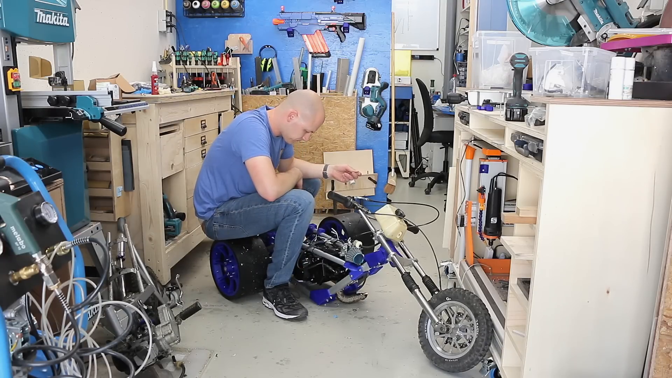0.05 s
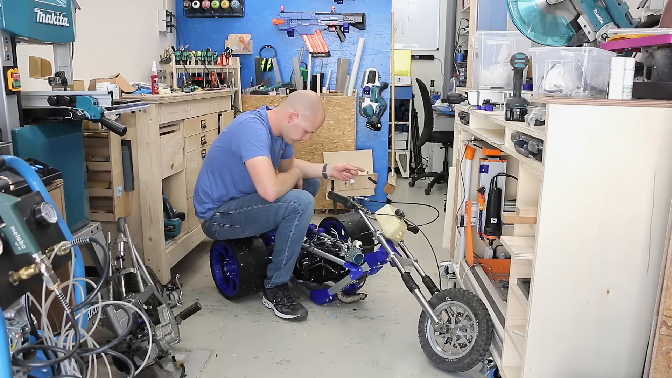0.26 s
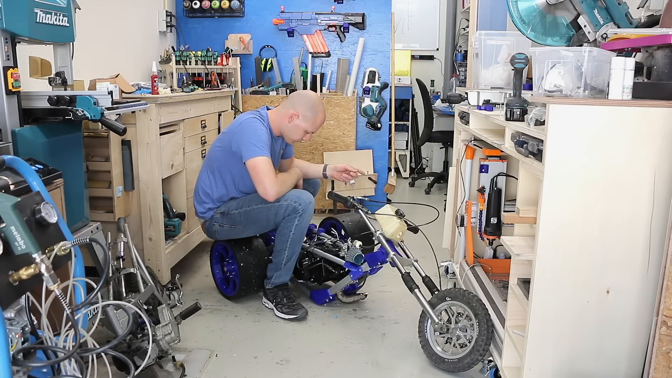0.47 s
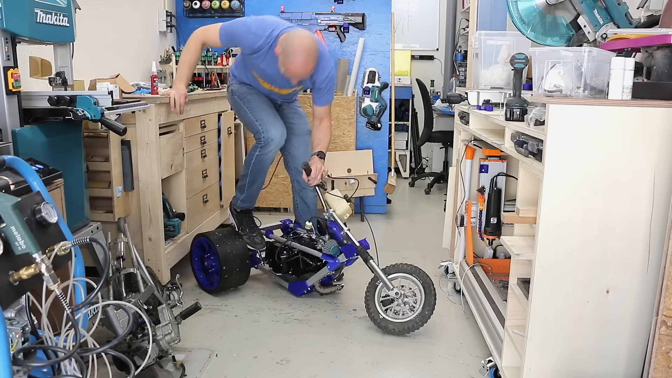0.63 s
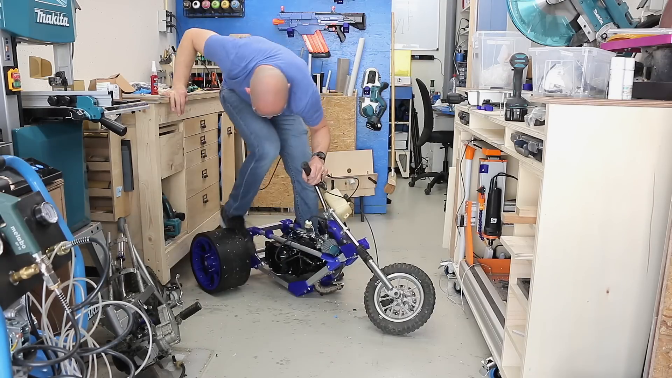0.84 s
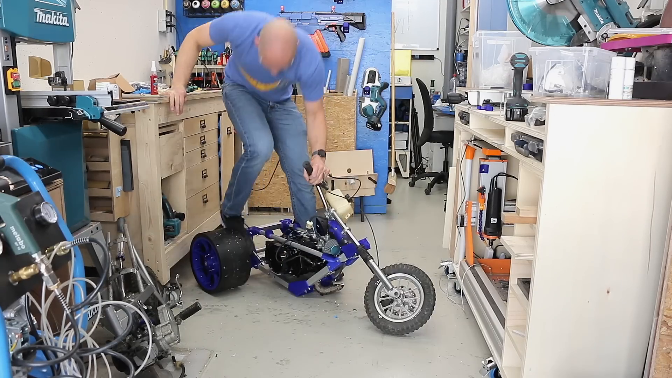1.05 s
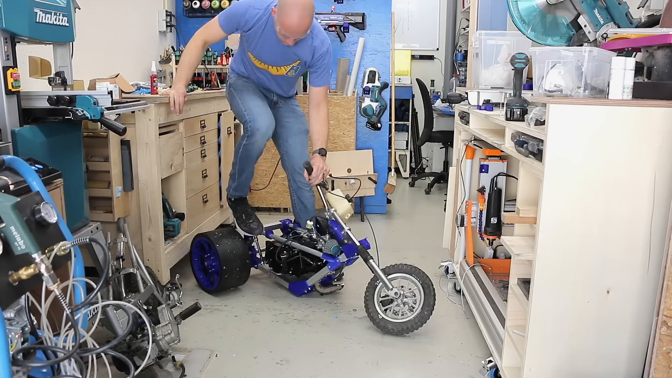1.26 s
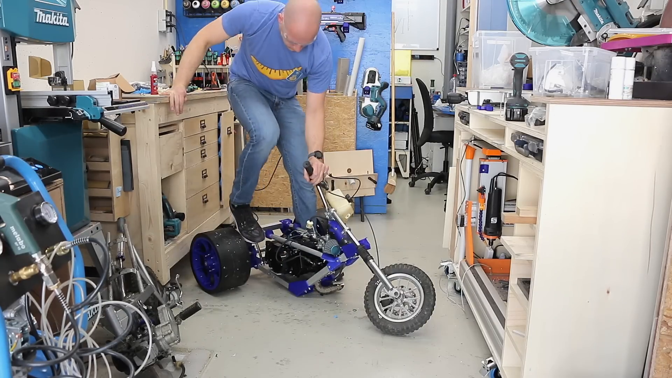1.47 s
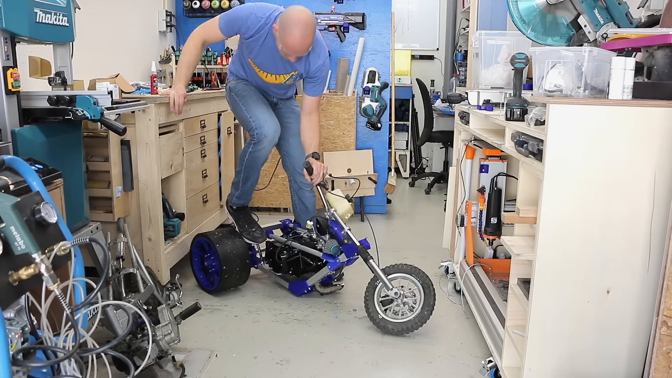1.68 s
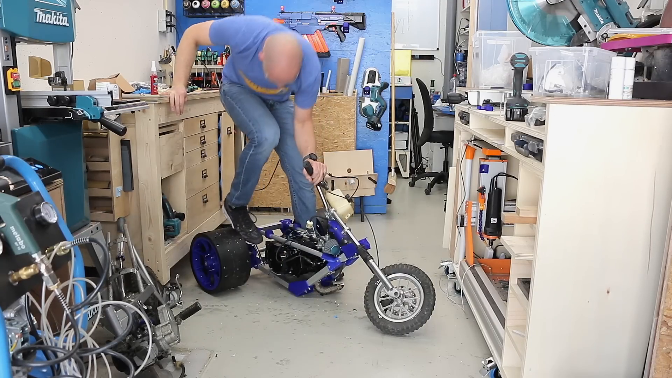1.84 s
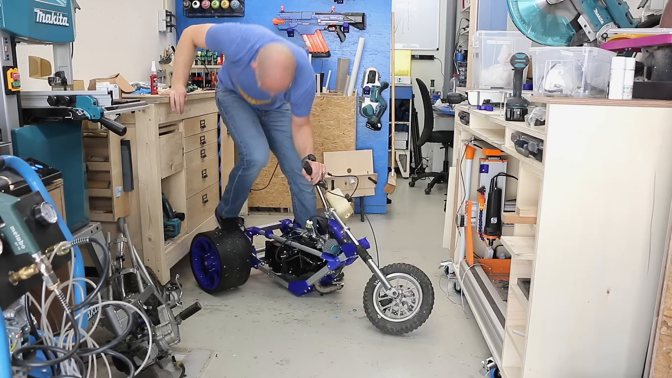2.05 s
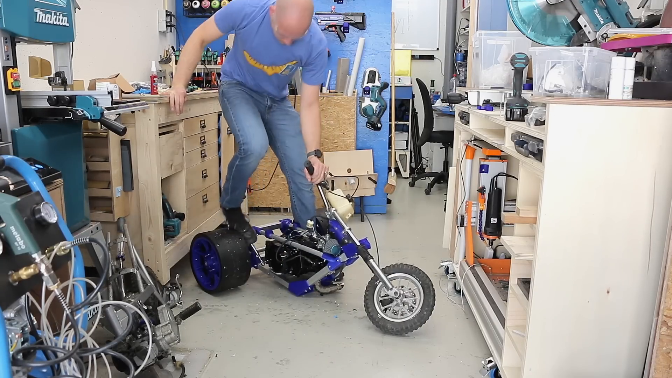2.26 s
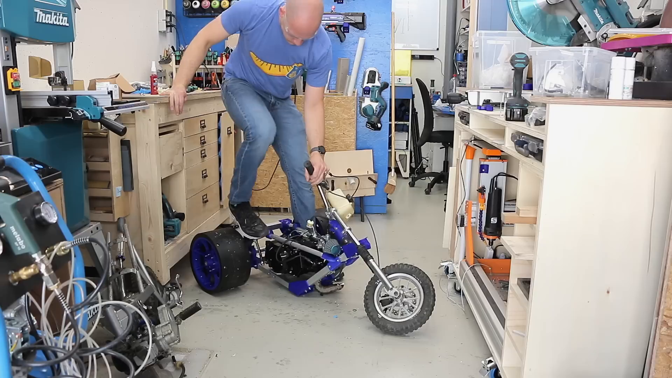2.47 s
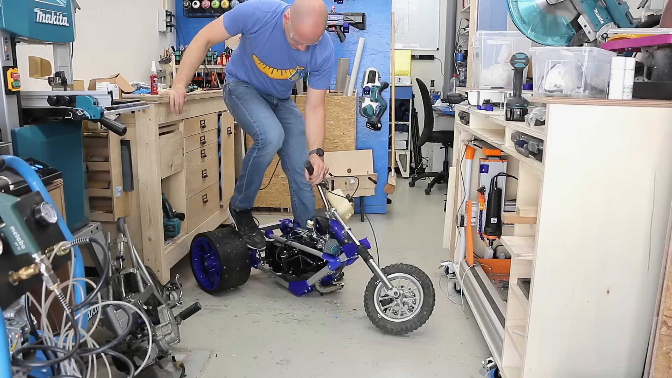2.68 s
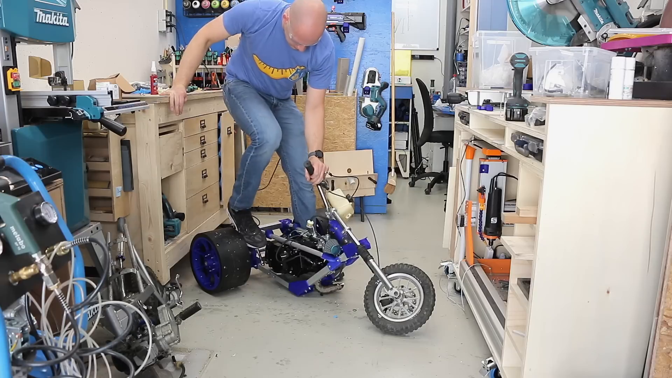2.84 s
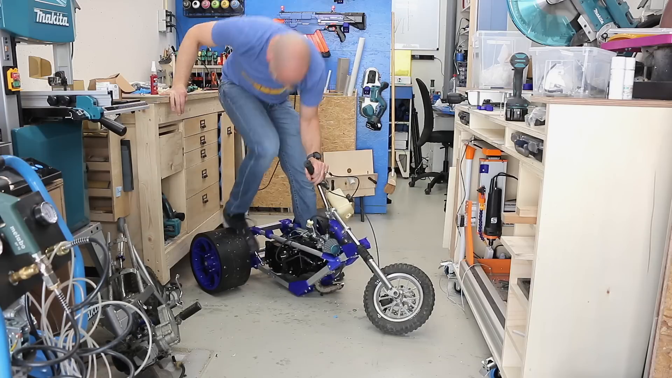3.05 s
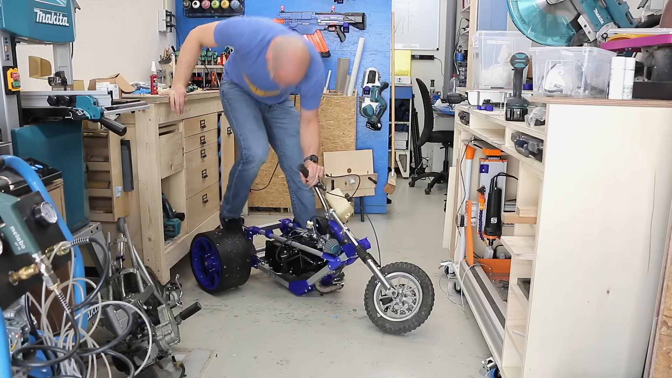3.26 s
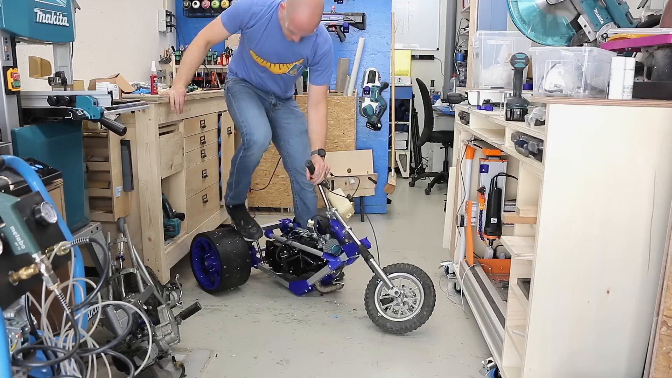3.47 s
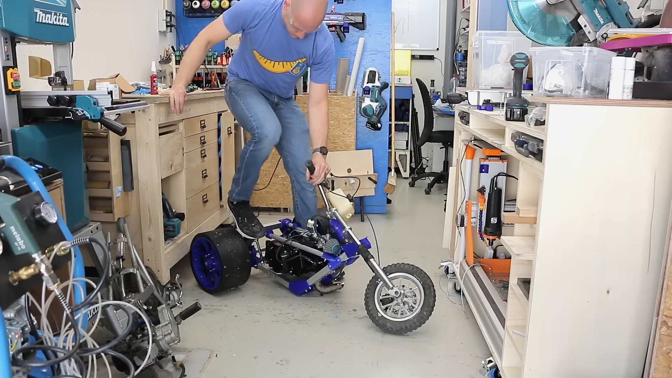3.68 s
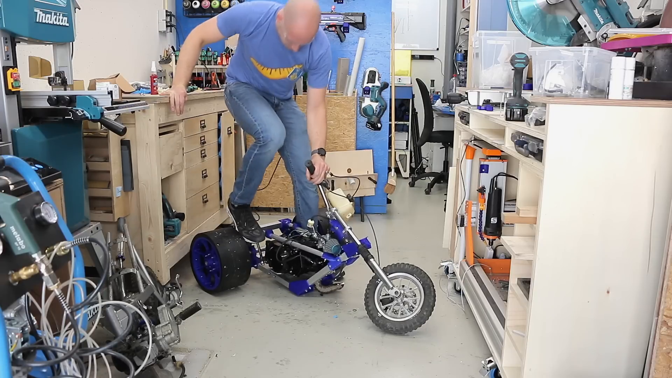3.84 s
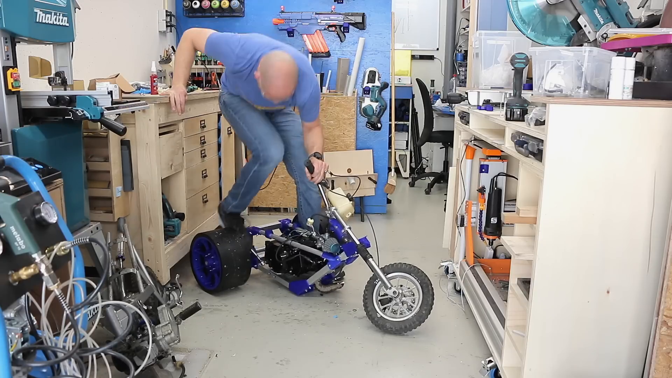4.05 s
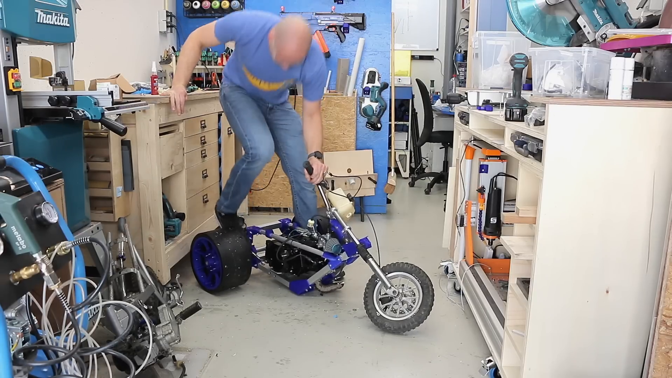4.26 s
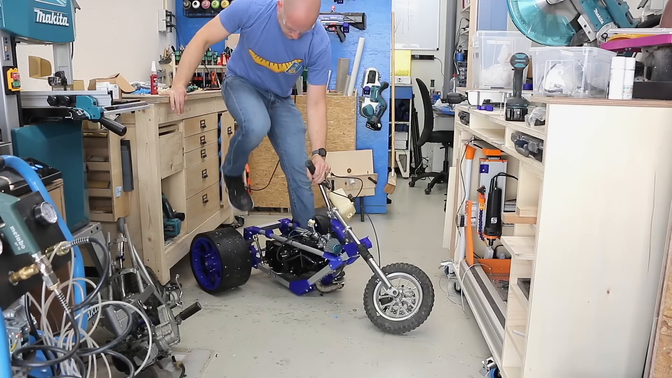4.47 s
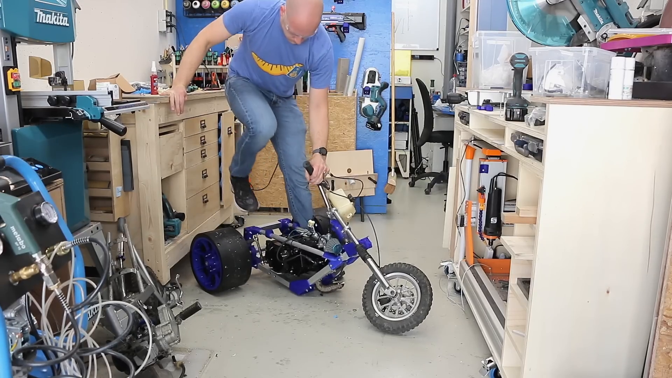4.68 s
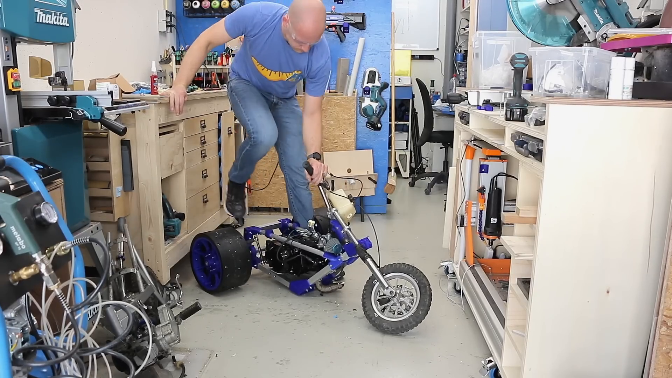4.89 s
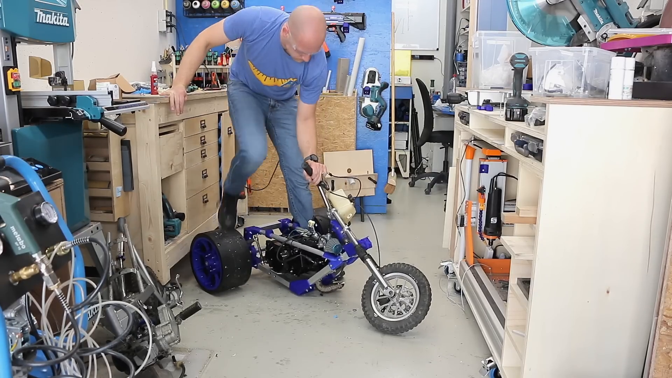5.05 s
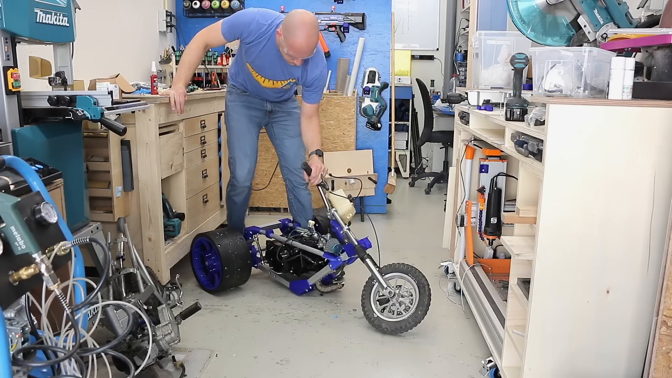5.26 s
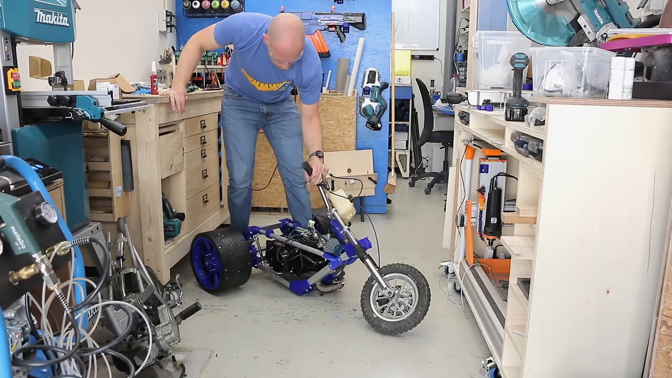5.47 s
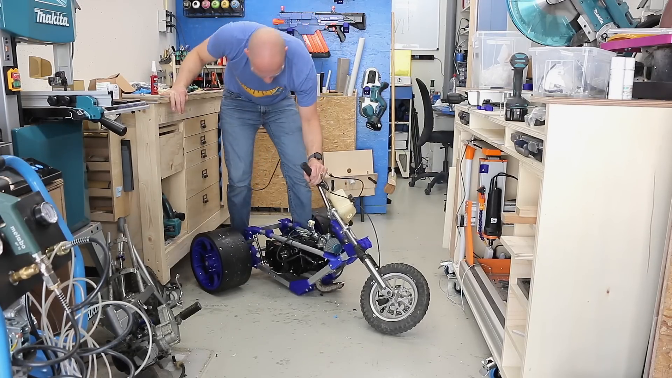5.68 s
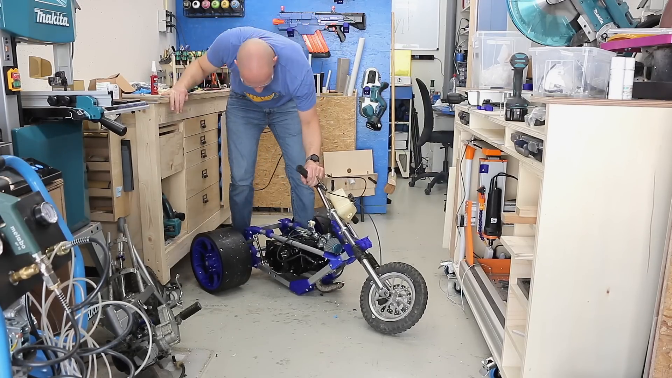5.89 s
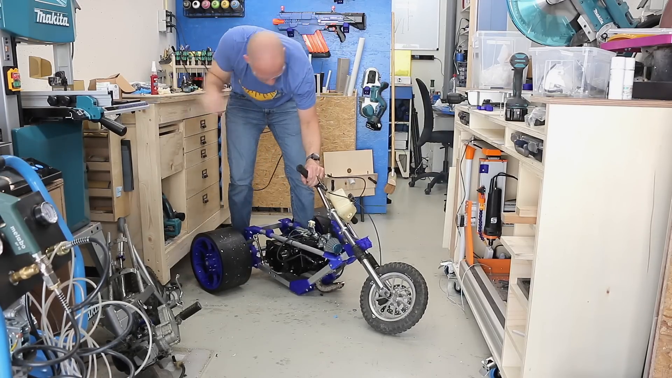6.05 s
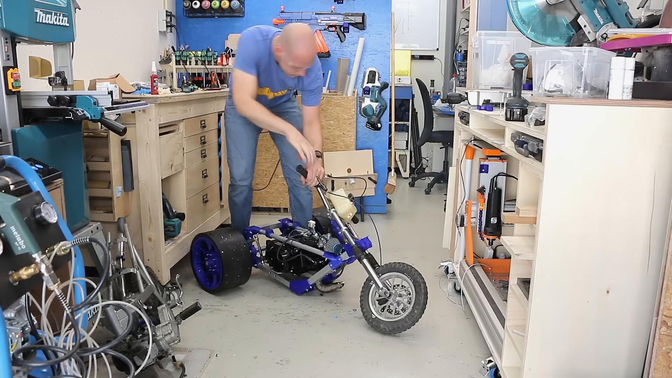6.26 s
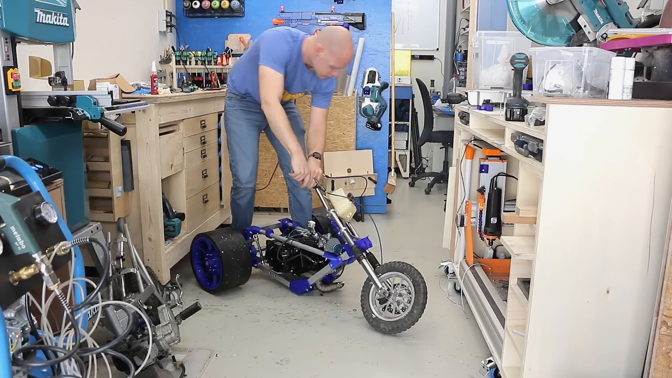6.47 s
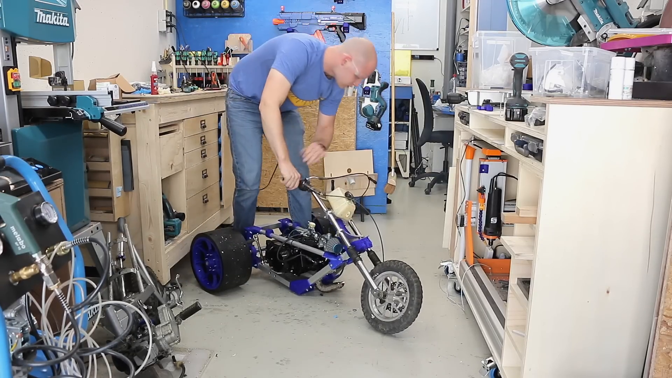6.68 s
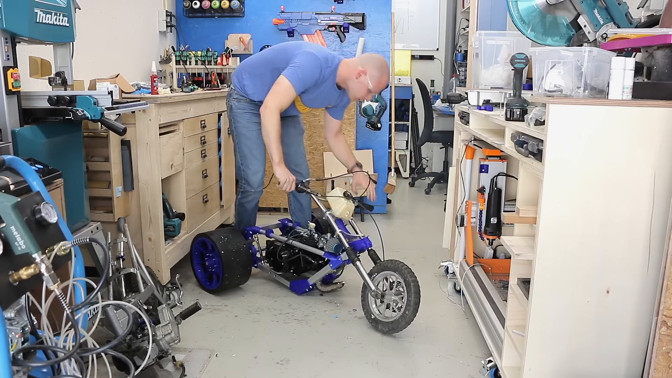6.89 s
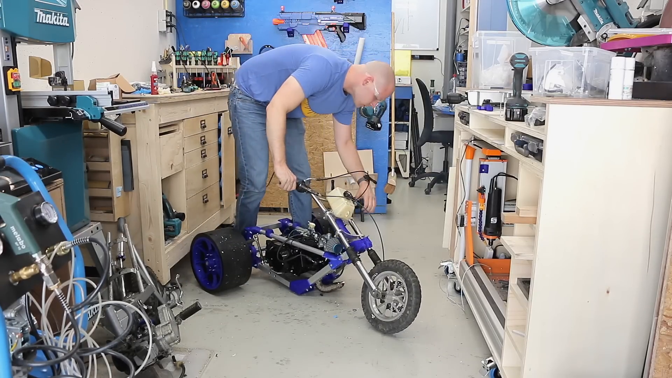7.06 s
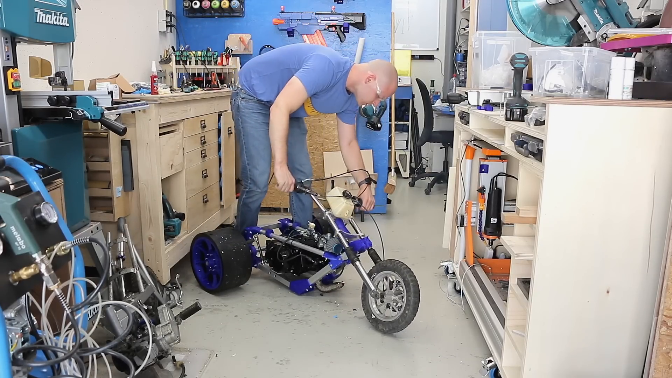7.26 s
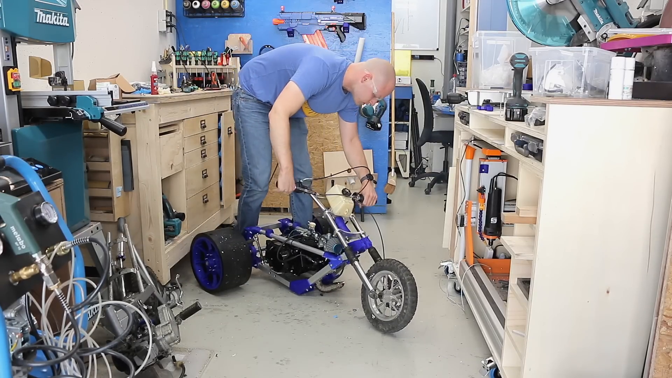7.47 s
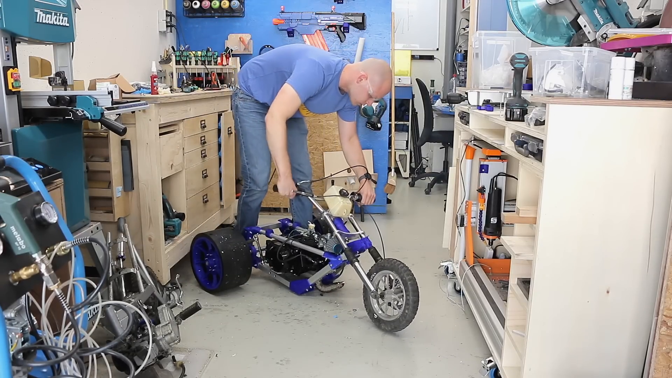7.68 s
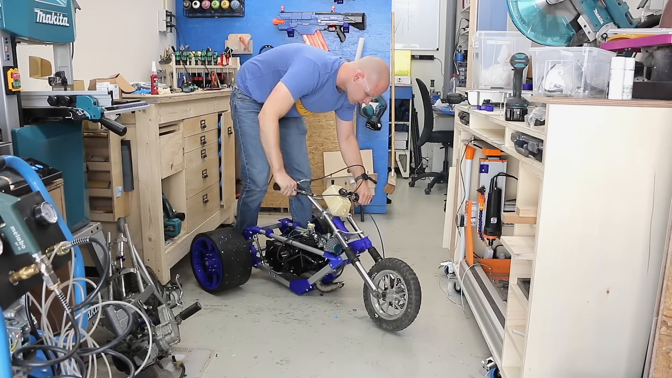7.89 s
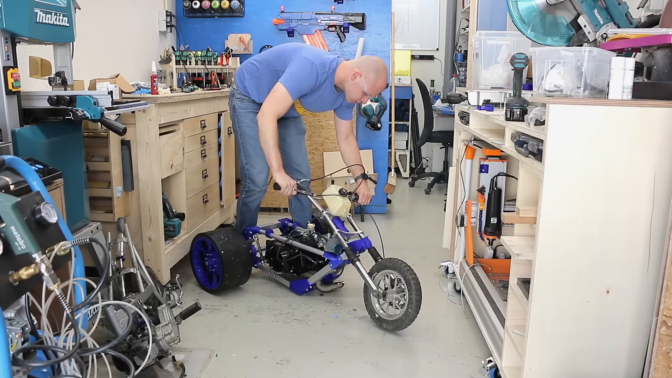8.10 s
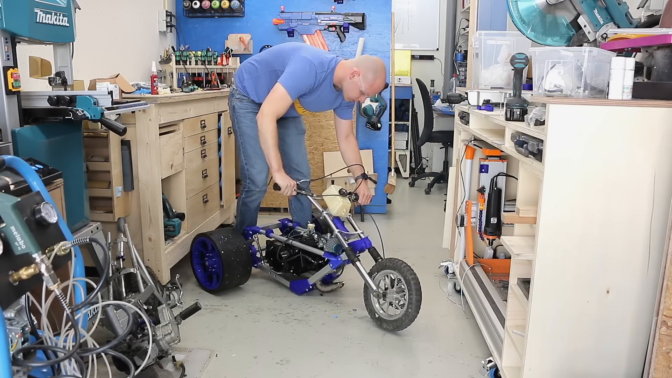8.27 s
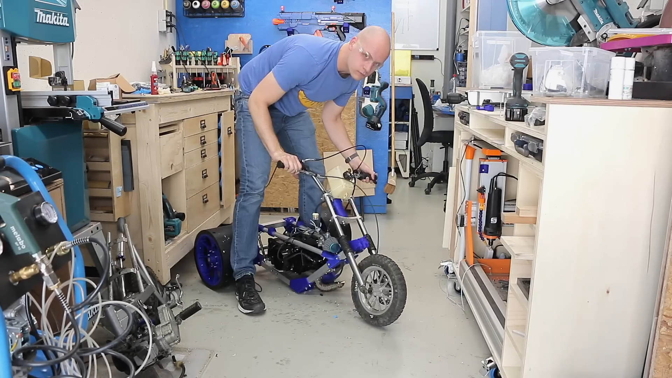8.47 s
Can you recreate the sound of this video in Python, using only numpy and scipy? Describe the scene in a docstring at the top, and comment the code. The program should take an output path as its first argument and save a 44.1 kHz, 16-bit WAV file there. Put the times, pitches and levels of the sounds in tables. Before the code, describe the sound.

In a cluttered workshop, a low hum cuts to a kick lever on a small motor trike: rapid gear whirr, ringing steel clanks, ratchet clicks and hollow unfired puffs. After three failed kicks the fourth catches. The single-cylinder engine sputters and stumbles, then revs in rising and falling surges, its raspy exhaust overloading the microphone, and ends on a sudden steady high roar.

```python
"""A workshop: a small four-stroke single is kicked over three times, catches on the fourth kick and is revved.
The kicks whirr with gear-tooth noise, clank with ringing steel and, until the engine catches, puff unfired gas.
Each firing then rings the pipe and lets out rasp; the microphone overloads, so the boom is squared off
and chops up the rasp. Four shots are cut together: the humming room, the kicks, the start, and full revs."""
import sys
import numpy as np
from scipy import signal
from scipy.fft import rfft, irfft, next_fast_len
from scipy.io import wavfile
from scipy.ndimage import uniform_filter1d

SR = 44100
rng = np.random.default_rng(int(sys.argv[2]) if len(sys.argv) > 2 else 0)


def persist_wave(psi):
    """Save psi, clipped to +-1, as 16-bit WAV."""
    counts = np.round(np.clip(psi, -1, 1) * 32767).astype(np.int16)
    wavfile.write(sys.argv[1], SR, np.atleast_2d(counts).T)


N = 376173
TIME = np.arange(N) / SR   # s

# cuts between the shots, each fading in from a dip: start_s, fade_s, new_shot_level_db
CUTS = [(0.675, 0.041, -0.5), (3.924, 0.071, 2), (8.342, 0.053, -6.5)]
OVERLOAD_DB = -13.5   # level at which the microphone input flattens
MID_RATE = 45         # middle engine speed, firings per s


def from_db(db):
    """Decibels to gain."""
    return 10 ** (np.asarray(db) / 20)


def rms_one(x):
    """Scale to unit power."""
    return x / np.sqrt(np.mean(x ** 2) + 1e-20)


def levelled(x):
    """Unit power over a sliding window of 59 ms."""
    power = np.maximum(uniform_filter1d(x * x, size=2600), 0)
    return x / np.sqrt(power + 1e-12)


def bell(centre_s, half_s):
    """A smooth swell that peaks at 1."""
    return np.exp(-np.minimum(((TIME - centre_s) / half_s) ** 2, 99) / 2)


def colour(x, spectrum):
    """Causal (minimum-phase) filter with the given spectrum and steep skirts; white noise keeps its power."""
    size = 8192
    hz, db = np.transpose(spectrum)
    known = np.log2(hz)
    octave = np.log2(np.maximum(np.arange(size // 2 + 1) * SR / size, 1))
    outside = np.abs(octave - np.clip(octave, known[0], known[-1]))
    # 24 dB per octave beyond the known range, for three octaves
    shape_db = np.interp(octave, known, db) - 24 * np.minimum(outside, 3)
    # folding the cepstrum forward in time makes the filter causal
    cepstrum = irfft(np.log(from_db(shape_db)))
    cepstrum[1:size // 2] *= 2
    cepstrum[size // 2 + 1:] = 0
    response = irfft(np.exp(rfft(cepstrum)))
    return signal.oaconvolve(x, response / np.linalg.norm(response))[:N]


def resonances(x, modes):
    """The response of each resonance (Hz, width Hz, dB), alternating in sign."""
    out = []
    for k, (hz, width, db) in enumerate(modes):
        r = np.exp(-np.pi * width / SR)
        gain = (-1) ** k * from_db(db) * (1 - r * r) / 2
        poles = [1, -2 * r * np.cos(2 * np.pi * hz / SR), r * r]
        out.append(signal.lfilter([gain, 0, -gain], poles, x + 1e-18))
    return out


def bursts(times, levels_db, decay_s, rise_s=0.0004):
    """Noise that builds quickly at each moment and dies away: a brief chatter of contacts."""
    starts = np.zeros(N)
    starts[(np.asarray(times) * SR).astype(int)] = from_db(levels_db)
    dying = signal.lfilter([1], [1, -np.exp(-1 / (decay_s * SR))], starts + 1e-18)
    rise = np.exp(-1 / (rise_s * SR))
    return signal.lfilter([1 - rise], [1, -rise], dying) * rng.standard_normal(N)


def workshop(x, wet_db, low_t60=0.43, mid_t60=0.24, high_t60=0.16):
    """Direct sound plus a dense tail from benches and walls that dies sooner in the treble; power is kept."""
    t = TIME[:SR * 3 // 4]
    noise = rng.standard_normal(len(t))
    spectrum = rfft(noise)
    hz = np.arange(len(t) // 2 + 1) * SR / len(t)
    tail, below = 0, 0
    for edge_hz, t60 in zip((500, 4600, SR), (low_t60, mid_t60, high_t60)):
        upto = irfft(spectrum * (hz < edge_hz), len(t))
        tail = tail + (upto - below) * from_db(-60 * t / t60)
        below = upto
    tail = tail * np.minimum(t / 0.0047, 1)   # reflections build up over 4.7 ms
    reflected = signal.oaconvolve(x, tail / np.linalg.norm(tail))[:N]
    wet = from_db(wet_db)
    return (x + wet * reflected) / np.hypot(1, wet)


def room_tone(near_db=-32, far_db=-62):
    """A low hum and rumble in the first shot, faint air afterwards."""
    # noise of the first shot: hz, relative_db_per_hz
    near_tone = [(25, 12), (60, 4.5), (120, -15.5), (220, -15.5), (700, -26), (1500, -33), (2500, -42.5),
                 (4200, -46), (7000, -58), (12000, -62)]
    # noise of the later shots: hz, relative_db_per_hz
    far_tone = [(40, -0.5), (150, 0), (450, -3), (1100, -9), (2800, -18.5), (4200, -15.5), (5500, -26.5),
                (12000, -44.5)]
    # steady hum lines: hz, level_db
    hum_lines = [(61.2, -39), (146, -57)]
    hum = np.zeros(N)
    for hz, db in hum_lines:
        hum += np.sqrt(2) * from_db(db) * np.sin(2 * np.pi * (hz * TIME + rng.random()))
    near = from_db(near_db) * colour(rng.standard_normal(N), near_tone) + hum
    far = from_db(far_db) * colour(rng.standard_normal(N), far_tone)
    return np.where(TIME < CUTS[0][0], near, far)


def lever(clank_db=-4, ring_db=-8, edge_db=4, clank_decay_s=0.011, edge_decay_s=0.0072):
    """The lever hits its stop and shakes the frame: a clank, a short ring and a bright edge."""
    # knocks of lever and frame: start_s, relative_clank_db, relative_edge_db
    knocks = [(0.827, -38, -45.5), (0.899, -28, -61), (0.935, -7, -47), (1.249, -3, -22),
              (1.449, -25, -36.5), (1.586, -44.5, -60), (1.72, -30.5, -59), (1.914, -36.5, -40.5),
              (1.991, -31, -44.5), (2.07, -19, -29.5), (2.42, -9.5, -25.5), (2.721, -37.5, -41.5),
              (3.127, -23, -26.5), (3.19, -7, -38.5), (3.553, -7.5, -29), (3.772, -48, -64),
              (3.995, -48, -47), (4.113, -44.5, -39), (4.148, -21, -52)]
    # ringing modes of the lever: hz, width_hz, relative_db
    lever_modes = [(504, 110, -4.5), (1017, 31, -6.5), (990, 57, 7.5), (1620, 39, -7.5), (1790, 35, 10),
                   (2130, 450, 0.5)]
    # colour of the clank: hz, relative_db_per_hz
    clank_colour = [(50, -8), (110, -10.5), (170, -3), (290, -19), (440, -5), (700, 0), (1000, 6.5),
                    (1280, -6), (1600, 4), (2200, -5), (2700, -30)]
    # colour of the bright edge: hz, relative_db_per_hz
    edge_colour = [(2000, -4), (3000, 3.5), (4500, -2.5), (6000, -12), (9000, -17), (16000, -50.5)]
    start_s, peak_db, bright_db = np.transpose(knocks)
    blows = bursts(start_s, peak_db, clank_decay_s)
    clank = colour(blows, clank_colour)
    ring = rms_one(sum(resonances(blows, lever_modes))) * np.std(blows)
    edge = colour(bursts(start_s, bright_db, edge_decay_s), edge_colour)
    return from_db(clank_db) * clank + from_db(ring_db) * ring + from_db(edge_db) * edge


def gears(teeth_per_s=1500, grain_db=1.0, rub=0.81, growl_db=-8.0, whirr_db=-4.5):
    """Gear teeth and ratchet rattle densely in the crankcase while the lever goes down."""
    # strokes of the lever: fastest_s, swell_s, run_down_s, relative_growl_db, relative_whirr_db
    strokes = [(.986, 0.08, 0.21, -13.5, -18.5), (1.184, 0.044, 0.06, -23, -12),
               (2.104, 0.17, 0.37, -17, -26), (3.211, .11, 0.36, -14.5, -21.5),
               (4.221, 0.17, 0.23, -19.5, -24)]
    # colour of the low gear growl: hz, relative_db_per_hz
    growl_colour = [(40, -2), (100, -9), (250, 5), (400, 5), (600, 2), (1000, 9), (1320, 3), (2100, 6.5),
                    (2600, -0.5)]
    # colour of the high gear whirr: hz, relative_db_per_hz
    whirr_colour = [(2000, -3.5), (3000, 0), (4000, 1.5), (5300, -9), (8500, -14), (11500, -26.5),
                    (14000, -20.5), (16000, -34.5)]
    growl, whirr = np.zeros(N), np.zeros(N)
    for s, swell_s, run_down_s, low_db, high_db in strokes:
        # up 33.5 dB to the fastest moment, then down 20 dB; silent outside the stroke
        stroke_db = np.interp(TIME, [s - swell_s, s, s + run_down_s], [-33.5, 0, -20],
                              left=-np.inf, right=-np.inf)
        stroke = from_db(stroke_db)
        growl += from_db(low_db) * stroke
        whirr += from_db(high_db) * stroke
    meshing = rng.random(N) < teeth_per_s / SR
    strength = from_db(grain_db * np.minimum(rng.exponential(1, N), 4))
    teeth = meshing * strength * rng.choice([-1, 1], N)
    contact = rms_one(rms_one(teeth) + rub * rng.standard_normal(N))
    low = from_db(growl_db) * colour(contact * growl, growl_colour)
    high = from_db(whirr_db) * colour(contact * whirr, whirr_colour)
    return low + high


def puffs(puff_db=0, swell_s=0.0094, breath=0.77):
    """An unfired charge leaves the pipe as a short hollow thump of tone and breath."""
    # charges leaving the pipe: start_s, relative_db, pitch_hz
    charges = [(0.942, -24.5, 153), (1.083, -19, 231), (1.257, -27, 422), (2.158, -24.5, 149),
               (2.341, -26.5, 286), (3.226, -16.5, 146), (3.396, -26, 286)]
    out = np.zeros(N)
    air = colour(rng.standard_normal(N), [(40, -1), (100, -17.5), (160, -1.5), (330, -4.0), (500, -18)])
    for s, peak_db, hz in charges:
        span = slice(int(s * SR), int(s * SR) + SR // 4)
        age = TIME[span] - s
        swell = age / swell_s * np.exp(1 - age / swell_s)
        thump = np.sin(2 * np.pi * hz * age) + breath * air[span]
        out[span] += from_db(peak_db + puff_db) * swell * thump
    return out


def screeches():
    """Loaded steel parts slip: a short swell of friction in one resonance."""
    # steel sliding on steel: centre_s, relative_db, pitch_hz, width_hz (before narrowing), half_length_s
    slips = [(0.986, -18.5, 3150, 500, 0.0096), (1.18, -26.5, 3940, 900, 0.012),
             (2.117, -13.5, 2930, 1290, 0.011), (2.119, -16.5, 950, 297, 0.014),
             (2.858, -65, 7180, 202, 0.019), (2.9, -66.5, 5530, 150.6, 0.023),
             (3.226, -17, 3000, 1100, 0.011)]
    out = np.zeros(N)
    for s, db, hz, width, half_s in slips:
        friction = rng.standard_normal(N)
        for _ in range(2):   # filtered twice, each time at 0.89 of the listed width
            friction, = resonances(friction, [(hz, width * 0.89, 0)])
        out += from_db(db) * rms_one(friction) * bell(s, half_s)
    return out


def clicks(click_db=-4, decay_s=0.0056):
    """Ratchet and valves click: hard, tiny steel contacts."""
    # ratchet and valve contacts: start_s, relative_db
    contacts = [(1.0297, -12.5), (1.089, -11.5), (1.2436, -11.5), (2.145, -14), (2.1807, -13), (2.228, -15),
                (2.27, -15), (2.3008, -15), (3.2948, -11), (3.3366, -17)]
    start_s, peak_db = np.transpose(contacts)
    contact = bursts(start_s, peak_db + click_db, decay_s)
    return colour(contact, [(1500, 11), (4000, 7.0), (8000, 3.5), (15000, -20.0)])


def throttle(kicked_rate=15, coast_s=.565, attack_s=0.034, release_s=0.088):
    """Each twist pulls the engine towards a top speed, easing as it nears it; shut, friction slows it."""
    # twists, the first as the engine catches: opened_s, shut_s, top_firings_per_s, time_to_top_s,
    # rest_firings_per_s (sunk towards once shut), open_rasp_db, shut_rasp_db (both before the effect of speed)
    twists = [(4.21, 4.62, 20.2, 0.37, 11, 2.5, -10.5), (4.921, 5.296, 43.77, .435, 35.66, 9, 4),
              (5.753, 6.365, 50.7, 0.64, 18.6, 8.5, -5.5), (6.703, 7.421, 55.54, .702, 18, 11, -12.5),
              (7.874, 8.343, 55.2, 0.55, 20.9, 14.5, 13.5)]
    rate = np.full(N, float(kicked_rate))   # firings per s
    rasp_db = np.full(N, float(twists[0][5]))
    for opened, shut, top, rise_s, rest, open_db, shut_db in twists:
        i, j = int(opened * SR), int(shut * SR)
        age = TIME[:N - i]
        rate[i:] = rate[i] + (top - rate[i]) * np.sin(np.pi / 2 * np.minimum(age / rise_s, 1))
        rasp_db[i:] = open_db + (rasp_db[i] - open_db) * np.exp(-age / attack_s)
        age = TIME[:N - j]
        rate[j:] = rest + (rate[j] - rest) * np.exp(-age / coast_s)
        rasp_db[j:] = shut_db + (rasp_db[j] - shut_db) * np.exp(-age / release_s)
    return rate, rasp_db


def running(boom_mid_db=18.5, boom_db_per_octave=7.5, rasp_db_per_octave=2, coast_boom_db=2.5,
            catch_db_per_s=700, catch_full_s=4.245, stumble_rasp_share=0.51, boom_sag_share=.3):
    """Firing rate, coasting (0-1), boom and rasp dB: the exhaust grows with speed and lurches at each stumble."""
    # the cold engine misses and then bangs: centre_s, half_length_s, boom_change_db
    stumbles = [(4.318, 0.043, -31.5), (4.653, 0.0099, 1), (4.683, 0.024, -13), (4.742, 0.014, 3),
                (4.818, 0.016, -12), (4.892, 0.03, -15.5)]
    rate, rasp_db = throttle()
    slowing = np.maximum(-uniform_filter1d(np.gradient(rate), size=2600), 0)
    coasting = slowing / slowing.max() * (rate > 30)
    octaves = np.log2(rate / MID_RATE)
    # the first firing builds up from silence
    catching_db = catch_db_per_s * np.clip(TIME - catch_full_s, -.5, 0)
    stumble_db = sum(db * bell(s, half_s) for s, half_s, db in stumbles)
    boom_db = boom_mid_db + boom_db_per_octave * octaves + catching_db + stumble_db
    boom_db = boom_db + coast_boom_db * coasting
    # the boom sinks as the pipe empties with the throttle shut
    boom_db = boom_db + boom_sag_share * np.minimum(rasp_db, 0)
    rasp_db = rasp_db + rasp_db_per_octave * octaves + catching_db + stumble_rasp_share * stumble_db
    # last shot, flat out: firings per s, coasting, boom dB, rasp dB
    flat_out = [[89.9], [0], [22], [18.5]]
    return np.where(TIME < CUTS[-1][0], [rate, coasting, boom_db, rasp_db], flat_out)


def scatter(x, sweep_s=.013, low_hz=200, high_hz=400):
    """The deep part of each pulse arrives first and higher tones trail it: an upward chirp (an allpass)."""
    size = next_fast_len(N + SR)
    hz = np.arange(size // 2 + 1) * SR / size
    lag_s = sweep_s * np.clip((hz - low_hz) / (high_hz - low_hz), 0, 1)
    phase = -2j * np.pi * np.cumsum(lag_s) * SR / size
    return irfft(rfft(x, size) * np.exp(phase), size)[:N]


def gas_pulses(rate, cycle, idling, jitter_s=.00007, uneven_db=2.2, gulp_lag_cycles=.4, gulp_db=-5):
    """One gas pulse every second turn of the crank, less even at low speed, with an intake gulp at idle."""
    fired = np.flatnonzero(np.diff(np.floor(cycle))) + 1
    chance = rng.standard_normal((len(fired), 3))
    unevenness = (MID_RATE / rate[fired]) ** 2
    pulses = np.zeros(N)
    at = np.clip(fired + (jitter_s * SR * unevenness * chance[:, 0]).astype(int), 0, N - 1)
    pulses[at] = from_db(uneven_db * np.minimum(unevenness, 2) * chance[:, 1])
    # the gulp is heard as a second pulse in each cycle
    gulp_at = np.clip(at + (gulp_lag_cycles * SR / rate[fired]).astype(int), 0, N - 1)
    pulses[gulp_at] += idling[fired] * from_db(gulp_db + uneven_db * chance[:, 2])
    return workshop(scatter(pulses), wet_db=-11)


def exhaust_boom(pulses, rate, coasting, idling, tilt_db=21, coast_db=8, lowest_multiple=5.27,
                 thin_db=22, idle_spread_db=11):
    """Gas pulses ring pipe and room; the balance of the resonances moves with engine speed."""
    # resonances of pipe and room: hz, width_hz, relative_db
    pipe_modes = [(147, 31, -16.5), (199.6, 31.3, -5), (256.6, 29, 0), (285.56, 28.7, 1.5),
                  (318.3, 32.4, 0), (359.9, 24.9, -1.5), (403.3, 12.7, -9), (478.3, 55.6, -11),
                  (550, 19.3, -6), (610.4, 46.4, -10.5)]
    # weight shifts to the upper resonances with speed, and back on the soft pulses of coasting
    sharpness_db = tilt_db * np.log2(np.maximum(rate, 40) / MID_RATE) - coast_db * coasting
    tone = np.zeros(N)
    for (hz, _, _), ring in zip(pipe_modes, resonances(pulses, pipe_modes)):
        tilted_db = sharpness_db * np.log2(min(hz, 600) / 280)
        # at idle single pulses ring the outer resonances too, below 450 Hz
        spread_db = idle_spread_db * idling * abs(np.log2(hz / 280)) * (hz < 450)
        # resonances below the lowest strong multiple of the firing rate thin out
        octaves_short = np.log2(lowest_multiple * np.minimum(rate, 52) / hz)
        thinned_db = thin_db * np.maximum(octaves_short, 0)
        tone += from_db(tilted_db + spread_db - thinned_db) * ring
    return levelled(tone)


def exhaust_rasp(cycle, idling, puff_share=0.98, rasp_floor=1.0, idle_hiss_db=-7, hiss_hz=6000):
    """Gas noise at the outlet surges with each firing; slow firings spit with a brighter hiss."""
    # colour of the gas noise: hz, relative_db_per_hz
    rasp_colour = [(200, -13.5), (500, 8.5), (1000, 2.5), (1800, -0.5), (3000, 1.5), (4200, -0.5),
                   (5200, -6), (8000, -9.5), (12000, -24), (16000, -26)]
    valve = rasp_floor + np.exp(-(cycle % 1) / puff_share)
    gas, spit = rms_one(valve) * rng.standard_normal((2, N))
    treble = signal.butter(2, min(hiss_hz, .4 * SR), "high", fs=SR, output="sos")
    hiss = signal.sosfilt(treble, spit)
    return colour(gas, rasp_colour) + from_db(idle_hiss_db) * idling * hiss


def engine():
    """Each firing rings the pipe and lets out rasp, both set against the overload level."""
    rate, coasting, boom_db, rasp_db = running()
    cycle = np.cumsum(rate) / SR
    idling = np.clip(np.log2(MID_RATE / rate) * 2 - 1, 0, 1)   # 1 at low speed, 0 at high speed
    pulses = gas_pulses(rate, cycle, idling)
    boom = from_db(boom_db) * exhaust_boom(pulses, rate, coasting, idling)
    rasp = from_db(rasp_db) * exhaust_rasp(cycle, idling)
    return from_db(OVERLOAD_DB) * (boom + rasp)


def scene():
    """Everything reaches one microphone, heard alike in both ears."""
    # the knocks carry much more of the room than the rest
    knocking = workshop(lever() + clicks(), wet_db=-0.5)
    whirring = workshop(gears() + screeches(), wet_db=-11)
    puffing = workshop(puffs(), wet_db=-12.0)
    mono = room_tone() + knocking + whirring + puffing + engine()
    return np.array([mono, mono])


def record(dry, bass_cut_hz=100, rumble_cut_hz=55, give=0.0008, presence=((4200, 900, -9),),
           cut_dip_db=-28.5, cutoff_hz=15900):
    """The input overloads; the bass cut after it makes each flat top sag into a sawtooth. Cuts fade in."""
    top, knee = from_db(OVERLOAD_DB), 5
    clipped = dry / (1 + np.abs(dry / top) ** knee) ** (1 / knee) + give * dry
    bass_cut = signal.butter(2, bass_cut_hz, "high", fs=SR, output="sos")
    rumble_cut = signal.butter(1, rumble_cut_hz, "high", fs=SR, output="sos")
    sagging = signal.sosfilt(rumble_cut, signal.sosfilt(bass_cut, clipped))
    bright = sagging + sum(resonances(sagging, presence))
    fader_db = np.zeros(N)
    for s, fade_s, shot_db in CUTS:
        fade_in_db = np.interp(TIME, [s, s + fade_s], [cut_dip_db, shot_db])
        fader_db = np.where(TIME < s, fader_db, fade_in_db)
    treble_limit = signal.ellip(12, .1, 80, cutoff_hz, fs=SR, output="sos")
    return signal.sosfilt(treble_limit, bright * from_db(fader_db))


dry = scene()
out = record(dry)
persist_wave(out)
```